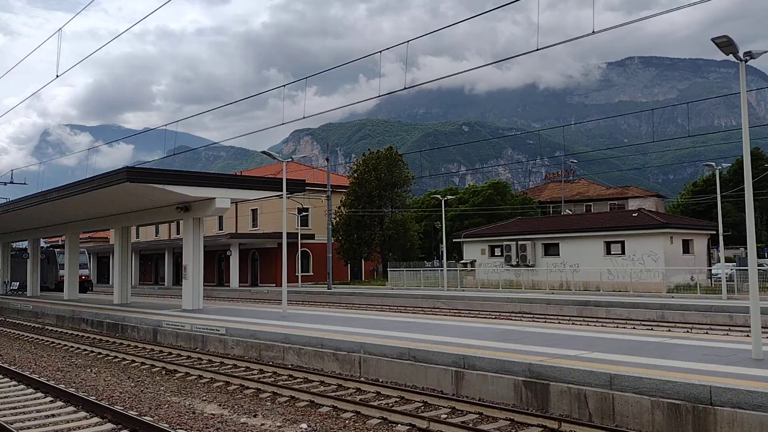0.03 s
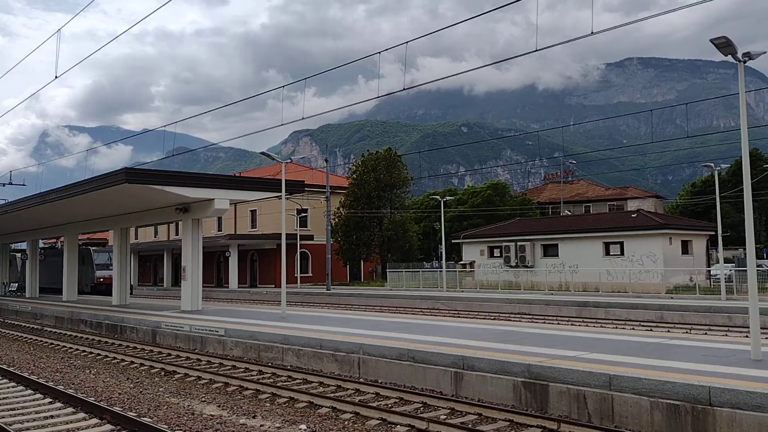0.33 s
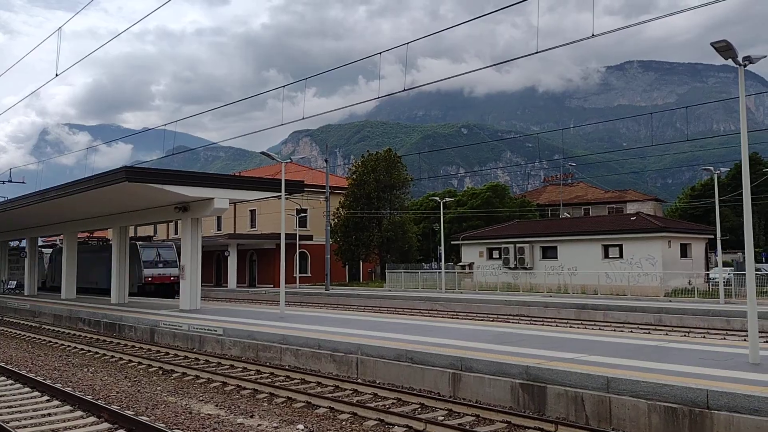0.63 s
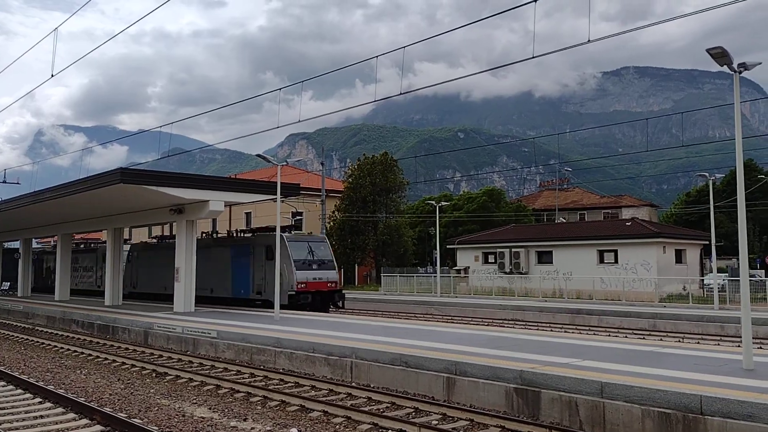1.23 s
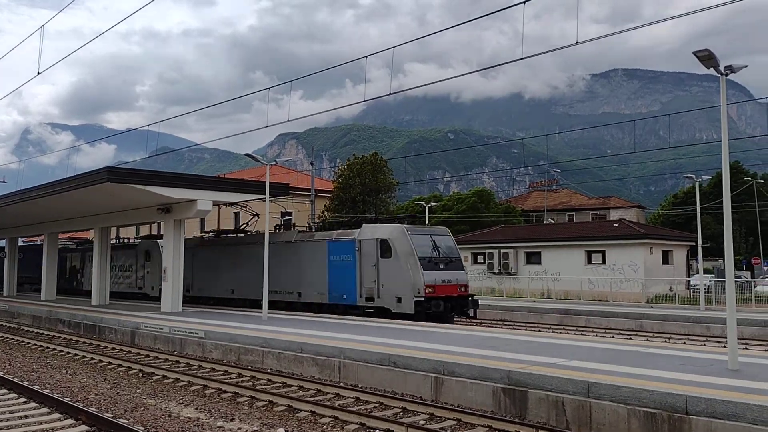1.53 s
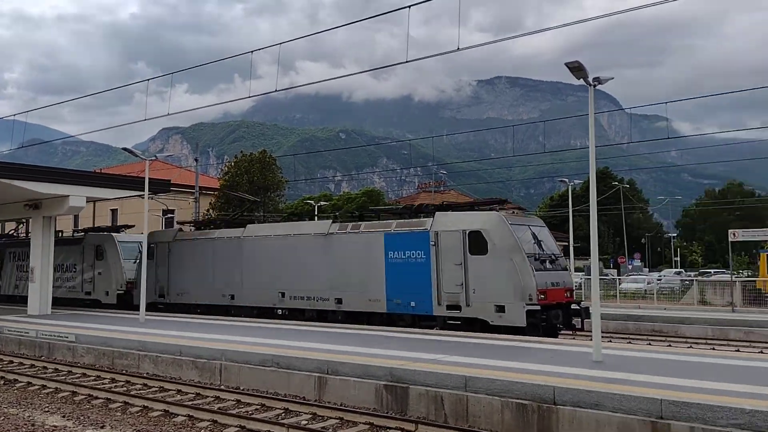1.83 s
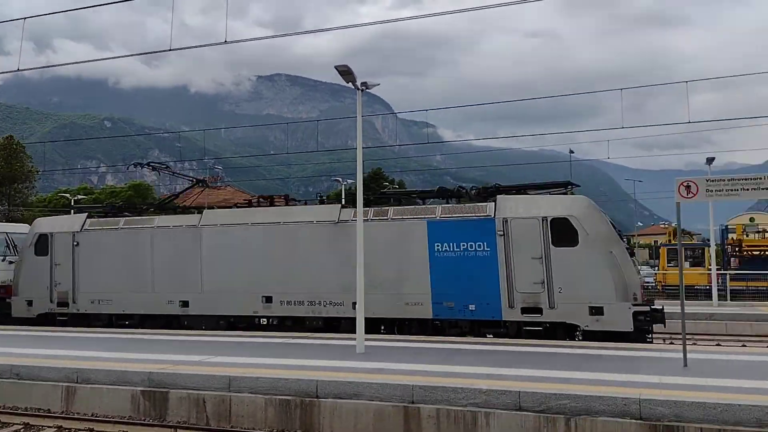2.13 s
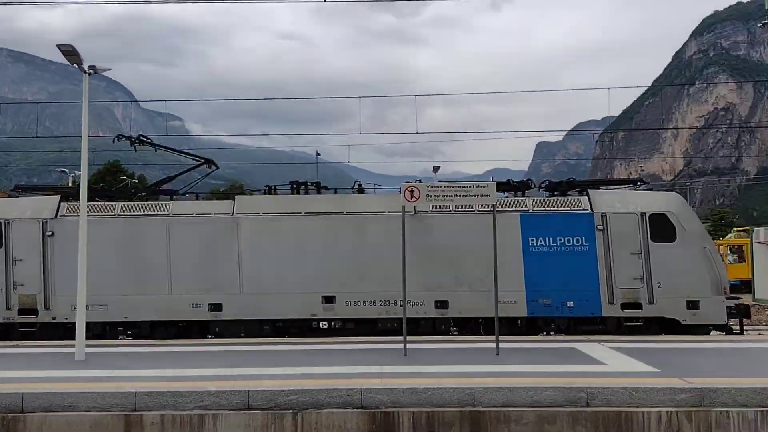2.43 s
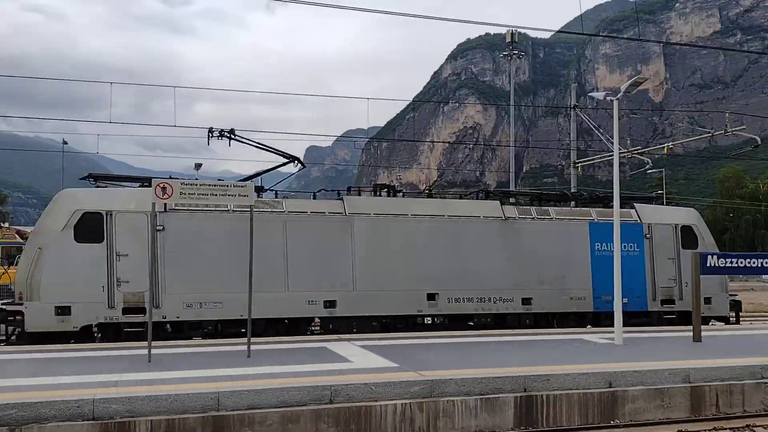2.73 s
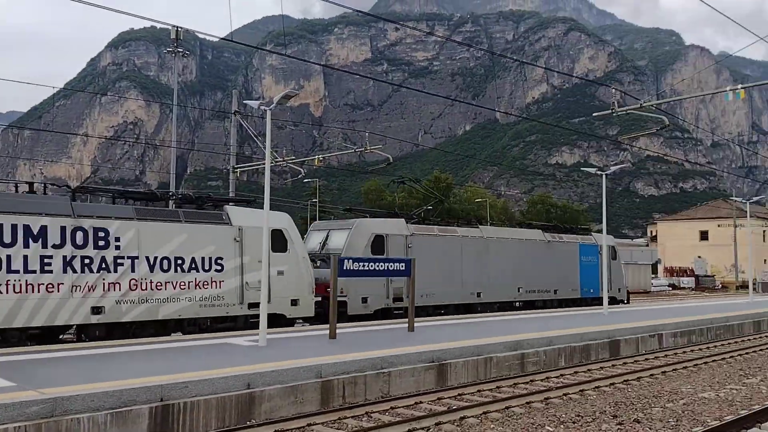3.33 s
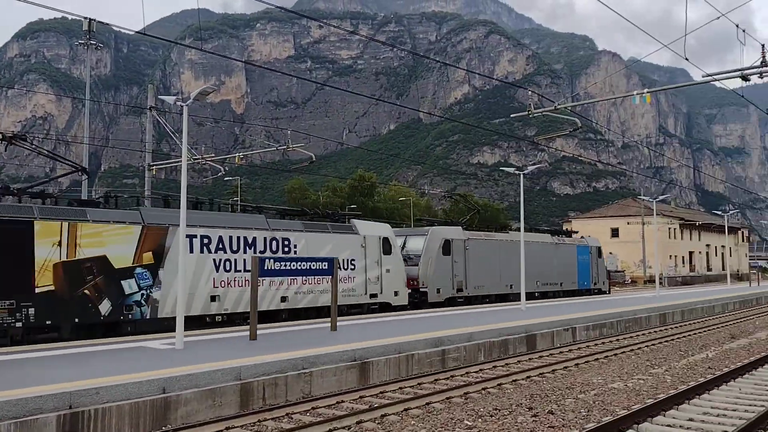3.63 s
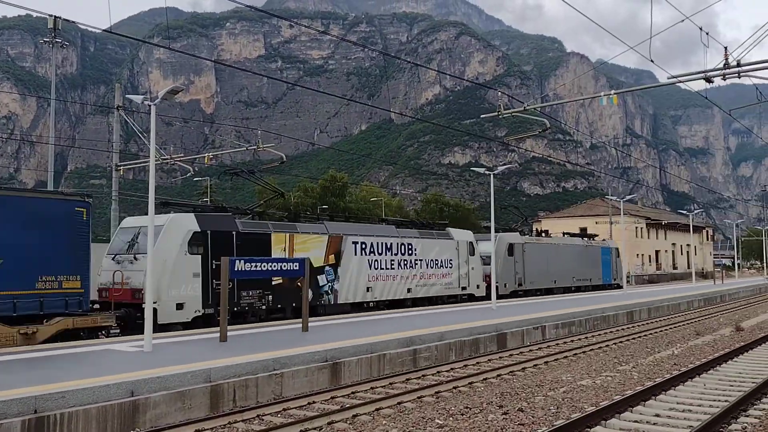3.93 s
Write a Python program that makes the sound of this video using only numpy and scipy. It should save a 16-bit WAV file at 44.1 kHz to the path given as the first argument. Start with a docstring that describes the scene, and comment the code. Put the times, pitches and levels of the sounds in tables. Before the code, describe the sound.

An electric freight train rushes past, wheels roaring and clattering over a rail joint.

```python
"""An open station platform: an electric freight train rushes past a pair of close microphone ports.
Rough wheels excite track, rails and wheel discs, whose roar and hiss swell as the locomotives near.
Motor and gear whines and the ringing of the wheelsets sink in pitch by the Doppler effect.
Axles strike a rail joint with a thud, a knock and a metallic ring. Moving air rumbles on the
microphone, with a rush and a boom as the first wagon nears."""
import sys
import numpy as np
from scipy import signal
from scipy.fft import rfft, irfft
from scipy.io import wavfile
from scipy.ndimage import uniform_filter1d

SR = 44100
rng = np.random.default_rng(int(sys.argv[2]) if len(sys.argv) > 2 else 0)


def pcm_store(signal):
    """Save signal as 16-bit PCM."""
    levels = np.round(np.clip(np.atleast_2d(signal), -1, 1) * 32767)
    wavfile.write(sys.argv[1], SR, levels.astype(np.int16).T)


N = 176400
T = np.arange(N) / SR
SPEED_M_S, DISTANCE_M, SOUND_M_S = 26.5, 15.5, 343
MESH_HZ, MESH_ORDERS = 804, (3, 4)  # gear mesh at rest and its audible harmonics

# Rolling noise: t/s, track body level/dB, wheel roar level/dB, hiss level/dB
ROLLING_LEVELS = [(.25, -45.5, -44, -51), (.55, -42.5, -42.5, -49), (1.0, -41, -40, -45),
                  (1.5, -37.5, -36, -40.5), (2.0, -34.5, -31.5, -36.5), (2.35, -32, -29, -32),
                  (2.65, -29.5, -27, -30.5), (3.0, -26.5, -24.5, -28), (3.3, -27, -24, -29),
                  (3.6, -26.5, -25, -29), (3.8, -30, -25, -30.5), (4.0, -30, -25.5, -29.5)]
# Spectra of track body, wheel roar, rail hiss and the top of that hiss: f/Hz, relative density/dB
BODY_SPECTRUM = [(40, -21), (100, -7), (165, 2.5), (235, -6), (300, -10.5), (385, -3), (450, -2), (510, 1),
                 (570, -4), (650, -7.5), (820, -2), (1030, -7.5), (1200, -15), (1800, -24), (15000, -90)]
ROAR_SPECTRUM = [(400, -24), (900, -23.5), (1250, -4), (1550, -4.5), (1900, -6), (2250, -3), (2800, -5),
                 (3500, -6.5), (4100, -10.5), (6000, -21), (15000, -47)]
HISS_SPECTRUM = [(1500, -38), (3500, -17), (4600, -3.5), (6000, -4), (7800, -3.5), (9300, -1.5),
                 (10600, -2), (12000, -8), (14000, -16), (15700, -25)]
SIZZLE_SPECTRUM = [(6000, -35), (9000, -12), (10300, 2), (11200, -3), (12500, -20), (15700, -45)]
# Powered bogies: t/s when abreast, wheel gain/dB, motor f/Hz, motor weight/dB, gear weight/dB
POWERED_BOGIES = [(2.57, -4, 1668, -4, -1.5), (2.82, -3, 1606, -4.5, .5), (3.14, -2, 1648, 3.5, -8),
                  (3.55, -6, 1640, -3, -1)]
# Whines: t/s, motor level/dB, third mesh harmonic level/dB, fourth mesh harmonic level/dB
WHINE_LEVELS = [(.25, -55, -64, -66), (.55, -47.5, -58, -58), (.9, -47.5, -56, -58),
                (1.22, -40, -53, -46.5), (1.62, -36, -45, -52), (1.86, -40, -44.5, -40),
                (2.15, -35, -48, -40.5), (2.55, -35.5, -47, -33), (2.78, -34, -46, -38),
                (3.12, -33, -46, -35.5), (3.45, -46, -52, -50), (3.7, -44, -52, -38), (4.0, -57, -55, -45)]
# Wheelset resonances: f/Hz at rest, width/Hz, level/dB abreast before the bogie's wheel gain
WHEELSET_MODES = [(1968, 105, -44.5), (2362, 110, -43), (2133, 88, -47.5), (465.6, 75, -45),
                  (3258, 310, -45), (966, 160, -42), (804, 74, -42), (1292, 120, -42.5)]
# Axle blows on the joint, in relative levels: t/s, thud/dB, knock/dB, clank and ring/dB
AXLE_BLOWS = [(2.335, -19.5, -26, -36), (2.376, -23, -24, -28.5), (2.436, -23.5, -30.5, -30),
              (2.468, -25.5, -24.5, -44), (2.718, -23, -30.5, -36), (2.757, -22.5, -21, -36),
              (2.812, -20.5, -26.5, -47), (2.941, -39, -41, -20.5), (3.033, -20, -29, -22.5),
              (3.069, -29, -24.5, -27), (3.136, -21.5, -47, -47), (3.165, -24, -35, -43),
              (3.319, -50, -26, -22), (3.352, -36, -48, -23.5), (3.421, -22, -39, -24.5),
              (3.461, -30, -23, -29), (3.519, -21, -32, -39), (3.633, -36, -29, -20), (3.67, -38, -33, -26),
              (3.698, -23, -31, -32), (3.741, -24, -23.5, -20.5), (3.78, -25.5, -27, -30.5)]
# Modes of the sleepers in their ballast and of the rail end: f/Hz, relative level/dB, T60/s
SLEEPER_MODES = [(113, -9, 0.14), (155, 2, .1), (196, -1, 0.12), (235.4, -10, 0.053)]
RAIL_END_MODES = [(764, -1, 0.13), (862, -1, 0.12), (1014, -2, .08), (1260, -11, .1)]
# Spectra of the bogie's knock and the rail's clank: f/Hz, relative density/dB
KNOCK_SPECTRUM = [(200, -30), (340, -2.5), (430, -6.5), (510, 6.5), (620, -9), (1000, -9), (8000, -79)]
CLANK_SPECTRUM = [(60, -50), (450, -31), (720, -2), (820, 0.5), (1000, -4), (1350, -11), (2500, -19),
                  (15000, -61)]
# Air rumble: t/s, level/dB
WIND_LEVELS = [(.25, -47.5), (.55, -38.5), (.8, -38), (1.2, -36), (1.7, -37), (2.05, -32.5), (2.68, -37),
               (2.85, -26.5), (3.08, -33.5), (3.4, -30), (3.8, -30), (3.95, -29)]
# Spectra of the air's rumble, rush and boom: f/Hz, relative density/dB
WIND_SPECTRUM = [(12, -9.5), (26, -5), (37, -5.5), (47, 6.5), (60, -5), (92, -5), (125, -14), (250, -19),
                 (2000, -91)]
RUSH_SPECTRUM = [(2000, -35), (4500, 4), (8000, 0), (11000, -1), (13000, -4), (15700, -17)]
BOOM_SPECTRUM = [(45, -39), (75, -2), (90, 7), (110, -14), (170, -17), (290, -14.5), (420, -33),
                 (1500, -90)]
# Likeness of the two ports: f/Hz, coherence (clipped to 0-1 in use)
PORT_COHERENCE = [(60, 1.6), (200, 0.83), (420, 1.3), (750, 0.8), (1100, 0.35), (1500, 1.01), (2300, 0.4),
                  (2900, 0), (3600, 0.17), (5000, -0.3), (15000, 0)]
# Balance of the ports: f/Hz, left minus right level/dB
PORT_BALANCE = [(60, 0.5), (380, -1), (700, 0), (1290, -3), (2380, -4), (4400, -2), (8100, -3), (15000, -5)]
# Arrival at the ports: f/Hz, lead of the left/s
PORT_LEAD = [(400, 0.00025), (800, .00024), (1100, 0.00034), (1400, 0.00045), (1800, 0.00045),
             (2600, 0.00049), (3100, 0.00045), (4100, 0.00048), (10000, .00056)]


def rolling():
    """Roughness excitation: wheels shake track, rails and discs; one contact rattle modulates all three."""
    rattle = drift(45)
    body = noise(BODY_SPECTRUM, patchy_db=0.48) * level(ROLLING_LEVELS, column=1) * amp(0.72 * rattle)
    roar = noise(ROAR_SPECTRUM, patchy_db=1.5) * level(ROLLING_LEVELS, column=2) * amp(0.34 * rattle)
    hiss = noise(HISS_SPECTRUM, patchy_db=1.1) * level(ROLLING_LEVELS, column=3) * amp(0.35 * rattle)
    sizzle = swell(SIZZLE_SPECTRUM, at_s=2.6, width_s=0.33, db=-37)  # the first locomotive goes by
    return body + roar + hiss + sizzle


def drives():
    """Periodic excitation: the motors sing, and the gears whine at harmonics of their mesh frequency."""
    motors = [(abreast, hz, db) for abreast, _, hz, db, _ in POWERED_BOGIES]
    third, fourth = ([(abreast, order * MESH_HZ, db) for abreast, *_, db in POWERED_BOGIES]
                     for order in MESH_ORDERS)
    return (whine(motors, width_hz=83, scatter_db=5) * level(WHINE_LEVELS, column=1)
            + whine(third, width_hz=130, scatter_db=5.5) * level(WHINE_LEVELS, column=2)
            + whine(fourth, width_hz=60, scatter_db=1) * level(WHINE_LEVELS, column=3))


def whine(voices, width_hz, scatter_db, flutter_db=3, flutter_hz=30):
    """Superposition: each bogie adds a centred, fluttering tone and its scatter, weighted by nearness."""
    direct, scattered, power = np.zeros(N), np.zeros((2, N)), np.zeros(N)
    for abreast, hz, db in voices:
        tone, band, nearness = passing(hz, width_hz, abreast)
        weight = amp(db) * nearness ** 2
        direct += tone * weight * amp(flutter_db * drift(flutter_hz))
        scattered += band * weight
        power += weight ** 2
    return unit((direct + amp(scatter_db) * ports(*scattered)) / np.sqrt(power))


def wheels():
    """Resonance: rolling wheelsets ring in narrow bands that fall as 1/r by spherical spreading."""
    ringing = np.zeros((2, N))
    for hz, width_hz, db in WHEELSET_MODES:
        for abreast, bogie_db, *_ in POWERED_BOGIES:
            _, band, nearness = passing(hz, width_hz, abreast)
            ringing += band * amp(db + bogie_db) * nearness
    return ports(*ringing)


def passing(hz, width_hz, abreast):
    """Doppler effect: a bogie's falling tone, two noise bands around it, and its nearness (1 abreast)."""
    ahead_m = SPEED_M_S * (abreast - T)
    range_m = np.hypot(ahead_m, DISTANCE_M)
    heard_hz = hz / (1 - SPEED_M_S / SOUND_M_S * ahead_m / range_m)
    cycles = rng.random() + np.cumsum(heard_hz) / SR
    tone = np.exp(2j * np.pi * cycles)
    scatter = np.array([drift(width_hz / 2) + 1j * drift(width_hz / 2) for port in range(2)])
    return np.sqrt(2) * tone.real, (scatter * tone).real, DISTANCE_M / range_m


def joint_impacts(rise_s=0.0035, hold_s=0.012, t60_s=0.2):
    """Impact noise: at each axle the bogie knocks and the rail clanks; overlapping blows add in power."""
    impacts = np.zeros((2, N))
    for layer, spectrum in enumerate([KNOCK_SPECTRUM, CLANK_SPECTRUM]):
        power = np.zeros(N)
        for start, _, *blow_db in AXLE_BLOWS:
            age = T - start
            attack = np.clip(age / rise_s, 0, 1)
            decay_db = 60 * np.maximum(age - hold_s, 0) / t60_s
            power += (attack * amp(blow_db[layer] - decay_db)) ** 2
        impacts += steadied(noise(spectrum), samples=500) * np.sqrt(power)
    return impacts * amp(-1.6)


def sleeper_thuds():
    """Impulse response: each axle drops into the joint and excites the low modes of the sleepers."""
    return amp(5.5) * sum(struck(SLEEPER_MODES, start, db, rise_s=0.0056, detune=0.039)
                          for start, db, *_ in AXLE_BLOWS)


def rail_ends():
    """Free vibration: the rail end rings briefly after each wheel strikes it."""
    ring = sum(struck(RAIL_END_MODES, start, db, rise_s=0.0084, detune=0.022)
               for start, *_, db in AXLE_BLOWS)
    return ports(ring, ring) * amp(-3.5)


def struck(modes, start, blow_db, rise_s, detune):
    """Modal decay: one blow starts damped sinusoids, each mistuned by a small random fraction."""
    out, first = np.zeros(N), round(start * SR)
    age = T[:min(SR // 2, N - first)]
    ring = np.zeros(len(age))
    for hz, db, t60 in modes:
        tuned_hz = hz * (1 + detune * rng.standard_normal())
        ring += amp(db - 60 * age / t60) * np.sin(2 * np.pi * tuned_hz * age)
    attack = 1 - np.exp(-(age / rise_s) ** 2)
    out[first:first + len(age)] = ring * attack * amp(blow_db)
    return out


def air():
    """Flow noise: gusts rumble on the microphone, and air surges ahead of the first wagon."""
    wind = steadied(noise(WIND_SPECTRUM), samples=9000)
    rumble = wind * level(WIND_LEVELS) * amp(0.87 * drift(18))
    rush = swell(RUSH_SPECTRUM, at_s=3.812, width_s=0.038, db=-27)
    boom = swell(BOOM_SPECTRUM, at_s=3.817, width_s=0.054, db=-24)
    return rumble + rush + boom


def swell(spectrum, at_s, width_s, db):
    """Amplitude modulation: noise surges and fades under a Gaussian envelope."""
    return steadied(noise(spectrum), samples=900) * amp(db) * np.exp(-((T - at_s) / width_s) ** 2 / 2)


def noise(spectrum, patchy_db=0):
    """Spectral shaping: white noise, with brief random patches of level, is coloured for both ports."""
    _, _, cells = signal.stft(rng.standard_normal((2, N)), SR, nperseg=1024, noverlap=768)
    patches = uniform_filter1d(rng.standard_normal(cells.shape[1:]), size=4, axis=0)  # over frequency
    patches = unit(uniform_filter1d(patches, size=12, axis=1))  # over time
    white = signal.istft(cells * amp(patchy_db * patches), nperseg=1024, noverlap=768)[1][:, :N]
    colour = amp(at_frequency(spectrum, np.fft.rfftfreq(N, 1 / SR)))
    return unit(ports(*irfft(rfft(white) * colour, N)))


def ports(direct, diffuse):
    """Partial coherence: the left port hears first, and the two differ more in the treble."""
    hz = np.fft.rfftfreq(N, 1 / SR)
    coherence = np.clip(at_frequency(PORT_COHERENCE, hz), 0, 1)
    tilt = amp(at_frequency(PORT_BALANCE, hz) / 2)
    lag = np.exp(-2j * np.pi * hz * at_frequency(PORT_LEAD, hz))
    left = rfft(direct)
    right = coherence * left * lag + np.sqrt(1 - coherence ** 2) * rfft(diffuse)
    return irfft(np.array([left * tilt, right / tilt]), N)


def steadied(x, samples):
    """Envelope division: the running rms evens out the chance swells of a noise."""
    return x / np.sqrt(uniform_filter1d((x ** 2).mean(0), size=samples) + 0.041)


def drift(rate_hz):
    """Low-pass noise: a smooth random fluctuation of unit rms, up to the given rate."""
    hz = np.fft.rfftfreq(N, 1 / SR)
    phases = np.exp(2j * np.pi * rng.random(len(hz)))
    return unit(irfft(phases / (1 + (hz / rate_hz) ** 4), N))


def level(table, column=1):
    """Interpolation in decibels: gain over time from one column of a table."""
    rows = np.array(table)
    return amp(np.interp(T, rows[:, 0], rows[:, column]))


def at_frequency(points, hz):
    """Interpolation of a curve on a logarithmic frequency axis."""
    f, value = np.transpose(points)
    return np.interp(np.log(hz + 1), np.log(f), value)


def amp(db):
    """Decibel law: level to amplitude ratio."""
    return 10 ** (np.asarray(db) / 20)


def unit(x):
    """Normalisation to an rms of one."""
    return x / np.sqrt(np.mean(x ** 2) + 1e-20)


def scene():
    """Superposition: the sound pressures of all sources add at the platform."""
    return rolling() + wheels() + drives() + joint_impacts() + sleeper_thuds() + rail_ends() + air()


def record(dry, open_s=0.2277, open_db=-8, fade_s=0.14, cutoff_hz=15650):
    """Gating and band limiting: the microphone opens after a brief silence; the top treble is cut."""
    gate = np.clip((T - open_s) / 0.003, 0, 1)
    fade_in = amp(open_db * np.clip(1 - (T - open_s) / fade_s, 0, 1))
    low_pass = signal.firwin(511, cutoff_hz, window=("kaiser", 9), fs=SR)
    return signal.oaconvolve(dry * gate * fade_in, low_pass[None], "same")


dry = scene()
out = record(dry)
pcm_store(out)
```